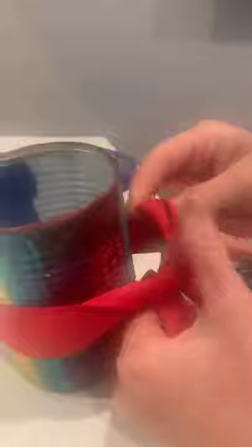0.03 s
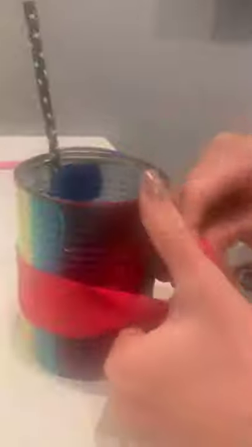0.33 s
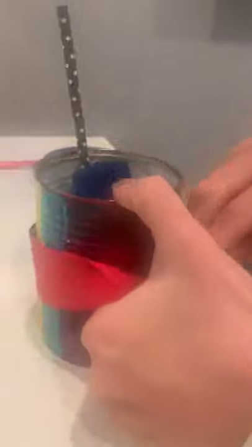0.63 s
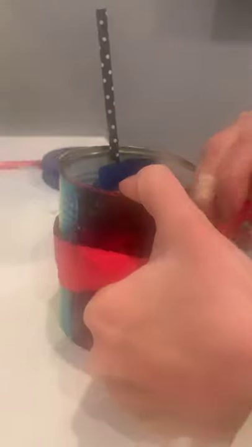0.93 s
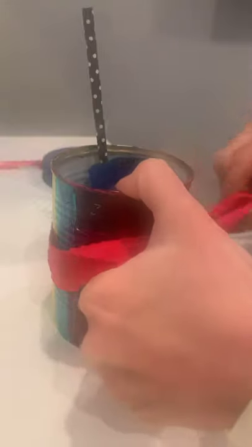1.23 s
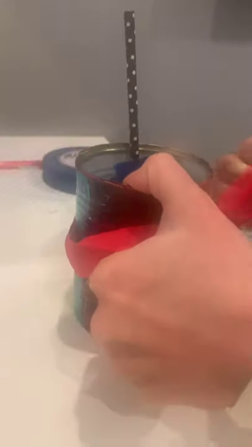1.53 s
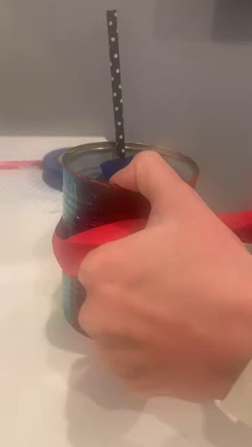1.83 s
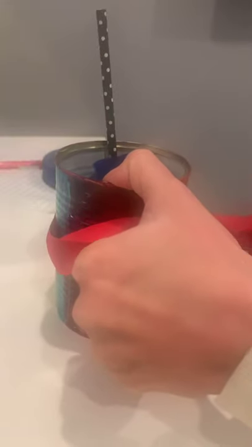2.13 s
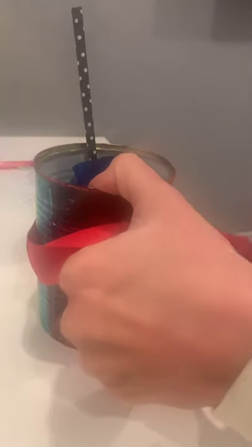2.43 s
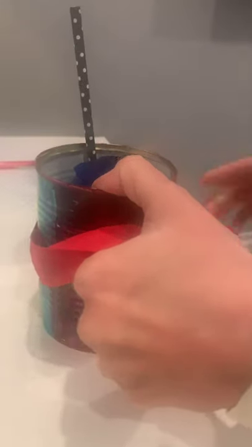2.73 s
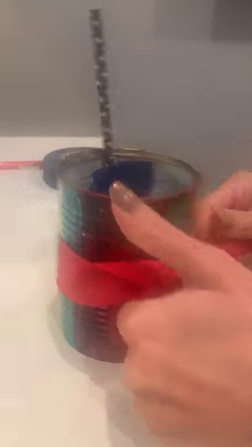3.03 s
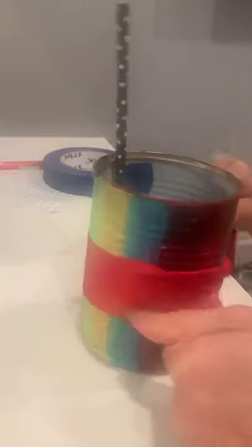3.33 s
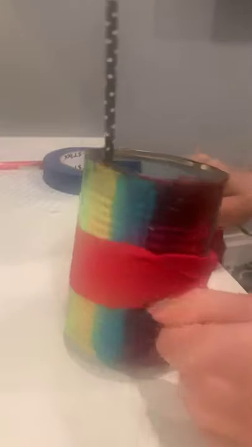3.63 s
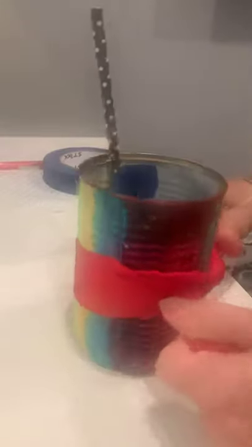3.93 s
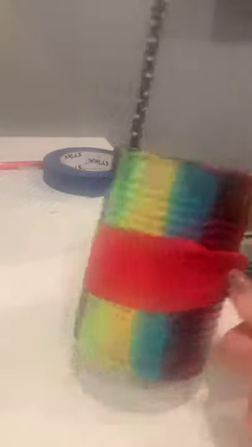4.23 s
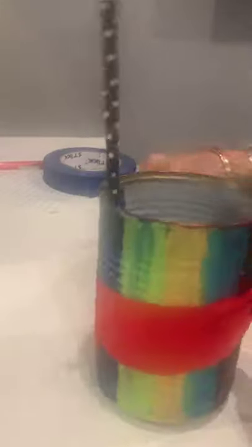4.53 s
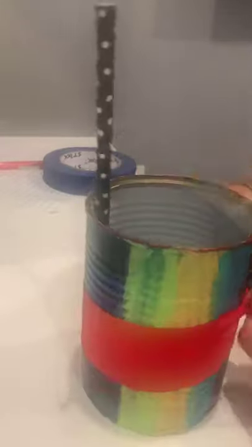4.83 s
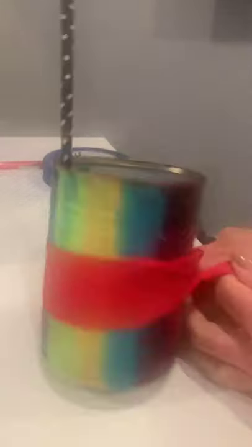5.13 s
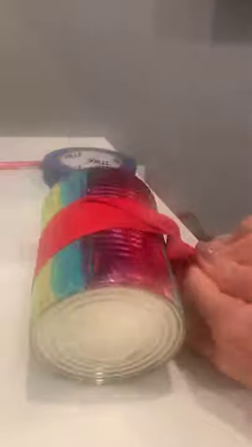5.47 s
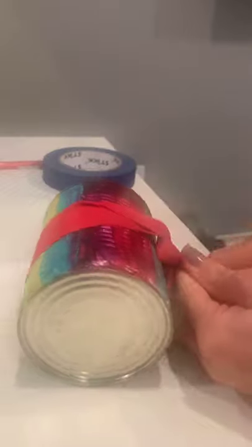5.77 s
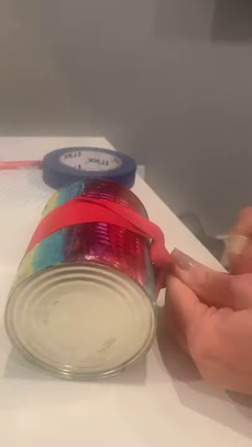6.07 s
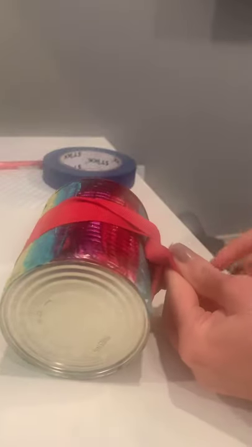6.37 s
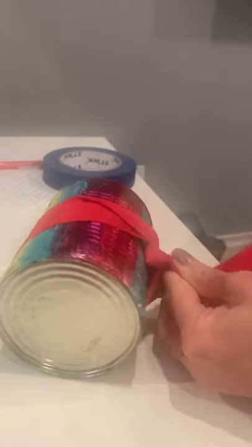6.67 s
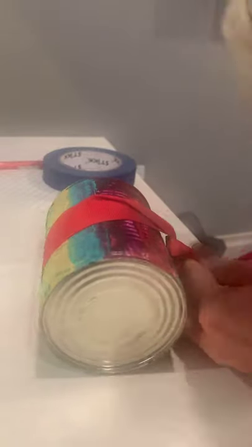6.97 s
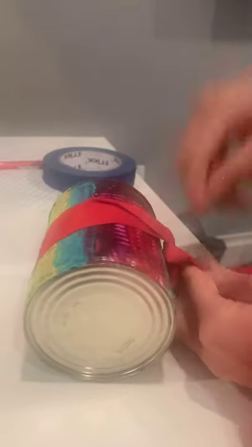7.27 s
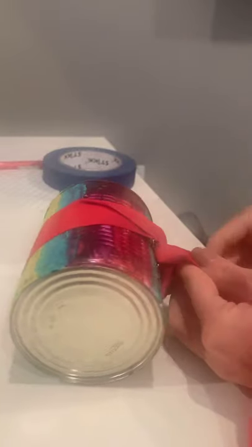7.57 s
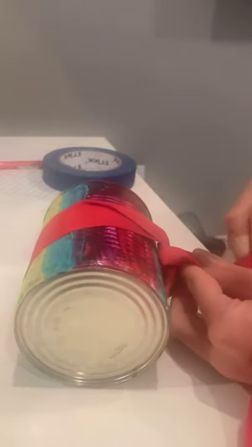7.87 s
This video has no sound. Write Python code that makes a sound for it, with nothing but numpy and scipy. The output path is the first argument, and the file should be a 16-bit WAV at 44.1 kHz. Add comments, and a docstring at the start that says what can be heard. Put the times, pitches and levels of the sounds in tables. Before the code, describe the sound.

Close to the microphone in a small room, a fabric ribbon rustles around a tin can that knocks hollowly and scuffs on a table. The ribbon is pulled through with a soft zip and a bracelet jingles. After a sharp knock and more shuffling, the can tips over, bounces and rings briefly. The bracelet jingles again, with fingernail ticks here and there and a low appliance hum throughout.

```python
"""A small room, at a table close to a phone: hands tie a fabric ribbon around a painted tin can.
The ribbon rustles as its threads catch and let go, and zips when its weave is pulled over an edge.
The can scuffs and knocks on the table, then tips, lands on its side, bounces and rings.
Fingernails tick, a bracelet jingles on the moving wrist, and an appliance hums behind it all."""
import sys
import numpy as np
from scipy import signal
from scipy.fft import rfft, irfft, next_fast_len
from scipy.io import wavfile
from scipy.ndimage import map_coordinates

SR = 44100
rng = np.random.default_rng(int(sys.argv[2]) if len(sys.argv) > 2 else 0)


def digitize_waveform(pressure):
    """Quantize a signal to 16-bit integers and store it at the path in sys.argv[1].

    Rows of a 2-D input are taken as channels; values are limited to [-1, 1].
    """
    field = np.atleast_2d(pressure).T
    bounded = np.clip(field, -1, 1)
    quanta = np.round(bounded * 32767).astype(np.int16)
    wavfile.write(sys.argv[1], SR, quanta)


N = 357210

# Levels are relative: each layer has its own trim in the mix.
# room tone: f/Hz, level/dB
HUM_PARTIALS = [(56, -54.5), (119, -53)]
RUMBLE_EQ = [(20, -40), (38, -5), (55, 4.5), (75, -4), (100, -0.5), (135, -5.5), (190, -1), (270, -14.5),
             (600, -25.5), (1500, -36), (5000, -42), (16000, -74)]
# reverb decay: f/Hz, t60/s
ROOM_DECAY = [(150, 0.46), (1000, 0.24), (5000, 0.024), (15000, 0.27)]
# phase lead of the left microphone port: f/Hz, phase/rad
LEFT_LEAD = [(0, 0), (60, -.1), (110, -1.4), (250, -3.1), (460, -6.3), (540, -7.4), (680, -6.7),
             (780, -8.7), (1000, -8.4), (1300, -6.2), (1480, -6.1), (1560, -3.8), (2050, -5.1), (2300, -4),
             (2950, -4.9), (3700, -4.6), (4800, -3.14), (6700, 0), (8900, 3.14), (13200, 9.42),
             (15300, 12.5)]
# stereo balance, left minus right: f/Hz, level/dB
LEFT_BALANCE = [(100, -1.1), (600, 0.5), (1200, -1), (1600, -5.5), (2400, -2.5), (3100, -1.5), (3700, 2),
                (5500, -1), (8000, 0)]

# the bracelet swings shut: t/s, level/dB
JINGLE_CUES = [(2.325, -37.5), (2.357, -33.5), (2.408, -31), (2.45, -33), (2.605, -50), (2.654, -45.5),
               (5.98, -62), (6.034, -49), (6.403, -40.5), (6.609, -39), (6.648, -27), (6.968, -25.5),
               (6.991, -22.5), (7.0256, -27), (7.079, -31), (7.214, -32.5), (7.237, -36), (7.317, -33)]
# the bangle's modes: f/Hz, level/dB, t60/s
BANGLE_MODES = [(7060, -12, .25), (8010, -19, .2), (9760, -14, .2), (10410, -7, .42), (11420, -13, .25),
                (11785, -9, .32), (12340, -8, .25), (12491, -1, .32), (12545, -3, .3), (14173, -3, .38),
                (14275, -5, .3), (14631, -10, .3), (14867, -8, .33), (15300, -12, .2), (15600, -9, .2)]
# fingernail ticks and fabric snaps: t/s, level/dB
TICK_CUES = [(0.0538, -41.5), (0.6466, -34), (0.8103, -35.5), (1.485, -24.5), (2.182, -20.5),
             (3.258, -39.5), (3.6122, -29.5), (4.0126, -26.5), (4.1802, -34), (4.8748, -32), (5.344, -41.5),
             (7.043, -35.5)]
# tone of ticks and rim clicks: f/Hz, level/dB
CLICK_EQ = [(500, -13.5), (2500, -7.5), (4200, -5), (6000, -3.5), (8500, -6), (12000, -6.5), (16000, -11)]

# resonances of the table and the can: f/Hz, width/Hz, level/dB
TABLE_MODES = [(136.5, 8.7, 1), (169, 29, -11.5), (211, 20, -3)]
BASE_MODES = [(256.6, 6.5, -4), (369.1, 26, 2), (429, 14, -9)]
BODY_MODES = [(557.5, 16, 5), (595.4, 13, 14.5), (611, 6.8, -7.5), (840, 42, -16.5)]
WALL_MODES = [(1068, 19, -4.5), (1129, 35, -4), (1224.4, 49, 1.5), (1471, 32, -8), (1732, 40, -4.5),
              (1930, 77, -8), (2162, 29, -10.5), (2510, 45, -10.5), (3510, 400, -16.5), (3974, 150, -10)]
# free ring of the toppled can: t/s, f/Hz, level/dB, t60/s
RING_CUES = [(5.709, 3650, -29, .04), (5.712, 2143, -44, .45), (5.712, 1075, -49, .3),
             (5.795, 1075, -44, .9)]
# the can is shoved over the table: t/s, length/s, swell/dB, base/dB, body/dB, wall/dB
SHOVE_CUES = [(.05, 0.061, 12.5, -41, -40.5, -71), (.205, 0.023, 4, -38.5, -26.5, -42),
              (.265, 0.1, -6, -38.5, -44, -50.5), (.4, 0.096, -6, -59.5, -61, -62.5),
              (.585, 0.093, 12, -53, -49.5, -51.5), (.91, 0.021, 1, -61, -48.5, -58),
              (1.24, 0.048, -9.5, -48, -50.5, -64), (1.3, 0.25, -9, -57, -54, -54.5),
              (1.55, 0.32, 6.5, -63.5, -54, -64.5), (1.745, 0.017, 9, -62, -45, -73),
              (2.15, .08, 1, -59.5, -52, -65), (2.24, 0.058, -3.5, -51, -43, -48.5),
              (2.8, 0.19, 10.5, -56, -50, -61), (2.96, 0.085, 2, -53, -40.5, -48.5),
              (3.115, 0.19, -8, -46, -43, -51), (3.335, .035, -5.5, -34.5, -44, -45.5),
              (3.42, 0.15, -1.5, -54, -52.5, -53.5), (3.525, .048, -2, -44, -37, -45.5),
              (3.6, 0.095, -4, -56, -55, -57.5), (3.73, 0.18, 5, -52, -50, -58),
              (3.97, 0.13, 2.5, -43, -43, -50.5), (4.13, 0.076, 2, -51, -47, -62),
              (4.3, 0.08, 9, -42.5, -41, -56.5), (4.4, 0.11, -1, -52.5, -49, -53.5),
              (4.55, 0.31, -3, -68, -55, -72), (4.8, 0.07, 6.5, -47.5, -37.5, -49.5),
              (4.9, 0.044, 6, -54, -41.5, -51.5), (4.94, .055, 2, -43.5, -38, -47),
              (5.122, .095, 0, -50, -38, -43.5), (5.24, 0.15, -9, -50, -44, -46.5),
              (5.72, .16, -18, -54, -46, -49.5), (6.215, 0.03, -5, -50, -72, -68)]
# the held can trembles between shoves: base/dB, body/dB, wall/dB
TREMBLE_DB = [-80, -74.5, -78.5]
# the can knocks upright, or lands on its side: t/s, body/dB, thud/dB, wall/dB, click/dB
KNOCK_CUES = [(.037, -28, -47.5, -65, -48), (.19, -35.5, -55, -48, -51), (.22, -20, -43.5, -42, -34.5),
              (.268, -34, -48, -60, -49), (.319, -11, -48, -56, -39), (.333, -11.5, -38, -30.5, -37),
              (1.249, -44, -47, -47, -48.5), (2.582, -31.5, -55.5, -57, -71),
              (2.799, -33, -60.5, -52, -56.5), (3.012, -24, -59.5, -47, -66),
              (3.12, -30.5, -63.5, -41, -51.5), (3.326, -8, -36, -18, -22.5), (3.735, -37, -55, -72, -52),
              (3.946, -31.5, -61.5, -59, -54), (3.966, -20, -44.5, -36, -43.5),
              (4.31, -30.5, -51, -52, -47), (4.344, -28.5, -45, -52, -52), (4.673, -64, -43.5, -46.5, -55),
              (4.873, -37, -47, -39.5, -53), (5.071, -59, -57, -54, -57), (5.131, -31, -53.5, -63, -64),
              (5.344, -46, -46, -46, -68), (5.604, -60, -51.5, -54, -45.5), (6.218, -72, -52, -59, -40),
              (7.402, -75, -59.5, -66, -58)]
FALL_CUE = (5.709, -26, -33, -30.5, -31.5)
# lost at each bounce: body/dB, thud/dB, wall/dB, click/dB
BOUNCE_LOSS = [2.7, 3.2, 6.5, 19]

# threads passing over an edge, one list a pull: t/s, f/Hz, level/dB
ZIP_PULLS = [
    [(1.75, 600, -50), (1.84, 1050, -42.5), (1.89, 1250, -36.5), (1.96, 1370, -44), (2.02, 1540, -44.5),
     (2.05, 1275, -45.5), (2.11, 1450, -39), (2.16, 1570, -46), (2.21, 1200, -51)],
    [(6.64, 2010, -81), (6.675, 1900, -51), (6.705, 1490, -59), (6.73, 1610, -60), (6.758, 1950, -45),
     (6.79, 1666, -54), (6.815, 1580, -47.5), (6.85, 1795, -67.5)],
]
# the ribbon as a sounding board, its hiss and its rasp: f/Hz, level/dB
ZIP_EQ = [(400, 9), (700, -8), (1300, -4.5), (2600, 0.5), (3400, -14), (5000, -16)]
HISS_EQ = [(1500, -35.5), (2800, -4), (4200, 0.5), (5500, 0.5), (7500, -5), (9000, -2.5), (12000, -4),
           (15500, -6.5)]
RASP_EQ = [(300, -13.5), (650, -2), (850, -7.5), (1250, -3.5), (1700, -2), (2350, 4.5), (3000, -14.5),
           (5000, -12.5)]
# the ribbon rubs over fingers and can: t/s, length/s, swell/dB, hiss/dB, rasp/dB
RUB_CUES = [(0, 0.19, -13, -56, -60.5), (.18, 0.026, -1.5, -45, -43.5), (.25, 0.15, -1.5, -60, -59),
            (.45, 0.23, 8.5, -54.5, -54), (.72, 0.066, -4, -60.5, -61.5), (.805, 0.023, -1, -52.5, -53.5),
            (.87, 0.12, 6.5, -57, -56), (1, 0.22, 0.5, -51.5, -52), (1.25, 0.23, -3.5, -54.5, -52.5),
            (1.475, .11, 7, -46, -43.5), (1.585, 0.23, 3.5, -47, -44), (1.805, 0.37, 2.5, -41.5, -40),
            (2.21, .08, -5, -55, -56), (2.335, 0.11, -5.5, -57, -79.5), (2.735, 0.26, 4, -55, -58.5),
            (2.955, 0.33, 6.5, -48.5, -53), (3.33, 0.058, -4, -51.5, -55), (3.42, 0.28, 2.5, -64, -65.5),
            (3.595, 0.069, -7.5, -51, -59.5), (3.68, 0.092, -5.5, -65, -65.5), (3.84, 0.2, -3, -59, -64.5),
            (4, 0.057, 2, -50.5, -51), (4.1, 0.33, 6, -57, -61), (4.55, 0.1, 9, -66, -76),
            (4.66, 0.21, 11.5, -55.5, -59.5), (4.935, 0.064, -11, -51, -55.5), (5.01, .31, 2.5, -57.5, -58),
            (5.34, 0.28, 2, -62, -60.5), (5.585, .23, 2.5, -50.5, -57), (5.86, .05, -1, -64, -65.5),
            (6.18, 0.15, 1, -55, -55.5), (6.37, .23, 3.5, -64.5, -66.5), (6.61, 0.22, -1, -51.5, -56.5),
            (6.89, 0.16, 10, -62, -62.5), (7.07, 0.16, -2, -61.5, -67.5), (7.39, .19, 6, -63.5, -66.5),
            (7.64, .1, 7.5, -60.5, -62.5), (7.785, .09, 8.5, -59, -64.5), (7.91, .19, 2.5, -56, -62)]
# treble shelf on the hiss: t/s, level/dB
TREBLE_RIDE = [(0, 4.5), (.7, -2), (1.4, 0.5), (2.3, -3), (3.6, 2), (4.8, -0.5), (5.2, -3.5), (5.45, -11.5),
               (5.8, -4.5), (6.7, 1), (8.1, -9)]


def amp(db):
    """Decibels to gain."""
    return 10 ** (np.asarray(db) / 20)


def unit(x):
    """Scale to rms 1."""
    return x / np.sqrt(np.mean(x ** 2) + 1e-20)


def along(points, hz):
    """Read a curve on a log frequency axis."""
    f, values = np.transpose(points)
    return np.interp(np.log(hz + 1), np.log(f + 1), values)


def automation(rows):
    """One value per sample for each column after the time."""
    times, *columns = np.transpose(rows)
    return [np.interp(np.arange(N) / SR, times, column) for column in columns]


def wobble(rate):
    """A smooth random curve, rate knots a second."""
    return map_coordinates(rng.standard_normal(int(N * rate / SR) + 4), [np.arange(N) * rate / SR])


def filtered(x, response):
    """Filter x by a complex frequency response."""
    n = x.shape[-1]
    m = next_fast_len(n + SR // 4)
    return irfft(rfft(x, m) * response(np.fft.rfftfreq(m, 1 / SR)), m)[..., :n]


def coloured(x, eq):
    """x through an EQ curve, at rms 1."""
    return unit(filtered(x, lambda hz: amp(along(eq, hz))))


def resonate(x, modes):
    """x through a bank of resonances, at rms 1."""
    return unit(filtered(x, lambda f: sum(
        amp(db) * 1j * f * width / (hz * hz - f * f + 1j * f * width) for hz, width, db in modes)))


def add(track, s, sound):
    """Mix a sound into the track at time s."""
    part = track[max(round(s * SR), 0):][:len(sound)]
    part += sound[:len(part)]


def slips(rate, spread_db):
    """Tiny stick-slip impulses of unequal size and either sign, at rms 1."""
    sizes = amp(spread_db * np.minimum(rng.exponential(size=N), 3))
    return unit((rng.random(N) < rate / SR) * sizes * np.sign(rng.standard_normal(N)))


def stroke(length_s, swell_db, attack_s, release_db_per_s):
    """Envelope of one hand movement: it rises, holds while swelling or easing, and dies away."""
    t = np.arange(int((length_s + .5) * SR)) / SR
    hold_db = swell_db * (np.minimum(t / length_s, 1) - .5)
    return np.minimum(t / attack_s, 1) * amp(hold_db - release_db_per_s * np.maximum(t - length_s, 0))


def strokes(cues, rest_db, attack_s, release_db_per_s):
    """One envelope per level column: hand movements add in power over a resting floor."""
    power = np.ones((len(rest_db), N)) * amp(rest_db)[:, None] ** 2
    for s, length_s, swell_db, *levels_db in cues:
        shape = stroke(length_s, swell_db, attack_s, release_db_per_s)
        for track, db in zip(power, levels_db):
            add(track, s, (amp(db) * shape) ** 2)
    return np.sqrt(power)


def room_tone():
    """The bed: an appliance hums unsteadily over the room's rumble."""
    t = np.arange(N) / SR
    hum = sum(amp(db + 1.8 * wobble(6)) * np.sin(2 * np.pi * hz * t + .5 * wobble(2.7))
              for hz, db in HUM_PARTIALS)
    return hum + amp(-55) * coloured(rng.standard_normal(N), RUMBLE_EQ)


def room_reverb(x):
    """The walls answer each microphone port with a short tail."""
    hz, t, noise = signal.stft(rng.standard_normal((3, SR // 2)), SR, nperseg=256)
    decay = amp(-60 * t / along(ROOM_DECAY, hz)[:, None])
    _, tails = signal.istft(noise * decay, SR, nperseg=256)
    stereo = tails[0] + .71 * tails[1:]  # close ports share part of the tail
    predelayed = np.pad(x, (300, 0))[None]
    return signal.fftconvolve(predelayed, stereo / np.linalg.norm(stereo[0]), axes=1)[:, :N]


def bracelet():
    """Every collision rings the bangle and shakes small links, which clash at pitches of their own."""
    out, t = np.zeros(N), np.arange(SR // 3) / SR
    hz, mode_db, t60 = np.transpose(BANGLE_MODES)[..., None]
    attack = 1 - np.exp(-t / .003)
    rebounds = [(s + .015, db - 7.5) for s, db in JINGLE_CUES]  # the links meet a second time
    for s, db in JINGLE_CUES + rebounds:
        strength, detune, phase = rng.standard_normal((3, len(BANGLE_MODES), 1))
        partials = np.sin(2 * np.pi * (hz * (1 + .0025 * detune) * t + phase))
        ring = amp(mode_db + 3.2 * strength - 60 * t / t60) * partials
        add(out, s, amp(db - 17) * attack * ring.sum(0))
        for lag, pitch, softness in rng.random(size=(36, 3)):
            link_hz = 15900 - 6500 * pitch ** 1.3
            clash = np.sin(2 * np.pi * link_hz * t) * attack * amp(-60 * t / .065)
            add(out, s - .003 + .02 * lag ** 2, amp(db - 9.5 - 29 * softness) * clash)
    return out


def nail_ticks():
    """Nails and snapping fabric give short dry clicks."""
    out, t = np.zeros(N), np.arange(SR // 10) / SR
    for s, db in TICK_CUES:
        click = coloured(rng.standard_normal(len(t)) * amp(-60 * t / .035), CLICK_EQ)
        add(out, s, amp(db - 1) * click / np.abs(click).max())
    return out


def can_tipping(start_s=5.24):
    """The table rumbles as the can rolls over its rim."""
    envelope = np.zeros(N)
    lean = stroke(length_s=.29, swell_db=10, attack_s=.13, release_db_per_s=450)
    add(envelope, start_s, amp(-44.5) * lean)
    roll_eq = [(30, -27.5), (55, 7), (85, 14), (140, 0), (280, -31), (800, -59)]
    return envelope * coloured(rng.standard_normal(N), roll_eq)


def can_ring():
    """With the can on its side, its open mouth rings freely."""
    out, t = np.zeros(N), np.arange(SR) / SR
    attack = 1 - np.exp(-t / .0011)
    for s, hz, db, t60 in RING_CUES:
        add(out, s, amp(db - 60 * t / t60) * attack * np.sin(2 * np.pi * hz * t))
    return out


def can_scuffs():
    """The rim judders over the table and shakes base and body; grit catches and rings the wall."""
    base, body, wall = strokes(SHOVE_CUES, TREMBLE_DB, attack_s=.0099, release_db_per_s=379.5)
    catch = amp(3.13 * wobble(45))
    judder = slips(rate=450, spread_db=-.5) * catch
    grit = (slips(rate=900, spread_db=1.5) + .32 * slips(rate=30, spread_db=4)) * catch
    shell = body * resonate(judder, BODY_MODES) + wall * resonate(grit, WALL_MODES)
    return base * resonate(judder, BASE_MODES) + amp(-3) * shell


def can_bounces(count=2, first_flight_s=.035, shrink=.81):
    """Knock cues for the fall: the can lands and bounces, each time sooner and softer."""
    s, *levels_db = FALL_CUE
    lags = np.cumsum([0, *(first_flight_s * shrink ** np.arange(count))])
    return [(s + lag, *(np.array(levels_db) - k * np.array(BOUNCE_LOSS))) for k, lag in enumerate(lags)]


def struck(blow, modes, soft_hz):
    """Paint and paper cushion a blow and round off its treble; hand and table damp the ring."""
    t = np.arange(len(blow)) / SR
    cushioned = filtered(blow, lambda hz: 1 / (1 + 1j * hz / soft_hz) ** 2)
    return unit(amp(-60 * t / .17) * resonate(cushioned, modes))


def can_knocks():
    """Each blow clicks at the rim, rings the can's base, body and wall, and thuds the table."""
    board, can, t = np.zeros(N), np.zeros(N), np.arange(SR // 5) / SR
    click_envelope = (amp(-60 * t / .017) + .1 * amp(-60 * t / .09)) * (1 - np.exp(-t / .0012))
    for s, body_db, thud_db, wall_db, click_db in KNOCK_CUES + can_bounces():
        rim_chatter = .033 * rng.standard_normal(len(t)) * amp(-60 * t / .095)
        blow = (t == 0) + rim_chatter
        add(board, s, amp(thud_db - 5) * struck(blow, TABLE_MODES, soft_hz=896))
        add(can, s - .001, amp(thud_db - 11.5) * struck(blow, BASE_MODES, soft_hz=1200))
        add(can, s - .001, amp(body_db - 23) * struck(blow, BODY_MODES, soft_hz=1740))
        add(can, s, amp(wall_db - 15.5) * struck(blow, WALL_MODES, soft_hz=5000))
        # a brief swell of noise leads into each knock and softens its onset
        lead_in = rng.standard_normal(SR // 125) * np.linspace(0, 1, SR // 125)
        add(can, s - .0095, amp(click_db - 16) * coloured(lead_in, CLICK_EQ))
        click = rng.standard_normal(len(t)) * click_envelope
        add(can, s - .0015, amp(click_db - 18.5) * coloured(click, CLICK_EQ))
    # in the board, bending waves carry the treble faster than the bass
    return can + filtered(board, lambda hz: np.exp(-1j * .879 * np.sqrt(hz)))


def ribbon_zips():
    """The weave ticks over an edge: a rough pitch that follows the speed of the pull."""
    out, t = np.zeros(N), np.arange(N) / SR
    for pull in ZIP_PULLS:
        hz, db = automation(pull)
        phase = 2 * np.pi * np.cumsum(hz * (1 + .045 * wobble(600))) / SR
        tone = np.sin(phase) + amp(-3) * np.sin(2 * phase) + amp(-7) * np.sin(3 * phase)
        gate = (t > pull[0][0]) * (t < pull[-1][0])
        out += gate * amp(db + 1 + 2.5 * wobble(150)) * tone
    return filtered(out, lambda hz: amp(along(ZIP_EQ, hz)))


def thread_friction():
    """Threads catch and let go: smooth noise with fine grains."""
    return rng.standard_normal(N) + .78 * slips(rate=640, spread_db=2)


def ribbon_rustle(wall_share=.12, shelf_hz=8000):
    """Rubbed fabric hisses, its creases pop, and part of its rasp sounds through the can's wall."""
    hiss_gain, rasp_gain = strokes(RUB_CUES, rest_db=[-72.5, -76], attack_s=.024, release_db_per_s=301)
    grip = amp(1.3 * wobble(55))
    hiss = coloured(thread_friction() + amp(-15.5) * slips(rate=75, spread_db=8.5), HISS_EQ)
    treble_db, = automation(TREBLE_RIDE)
    treble = filtered(hiss, lambda hz: 1 / (1 + (shelf_hz / (hz + 1)) ** 6))
    hiss += (amp(treble_db) - 1) * treble
    cloth = coloured(thread_friction(), RASP_EQ)
    tin = resonate(slips(rate=900, spread_db=4), WALL_MODES)
    rasp = np.sqrt(1 - wall_share) * cloth + np.sqrt(wall_share) * tin
    return grip * (amp(.6) * hiss_gain * hiss + amp(-3.5) * rasp_gain * rasp)


def scene():
    """Close handling sounds with a touch of reverb, over the room tone."""
    ribbon = ribbon_rustle() + ribbon_zips()
    can = can_scuffs() + can_knocks() + can_ring() + can_tipping()
    close = ribbon + can + nail_ticks() + bracelet()
    return close + amp(-15) * room_reverb(close) + room_tone()


def record(dry, top_hz=15900):
    """The phone's two ports differ in phase and level, and pass nothing above its band limit."""
    side = np.array([[.5], [-.5]])  # left, right

    def ports(hz):
        lead = np.interp(hz, *np.transpose(LEFT_LEAD))
        return np.exp(1j * side * lead) * amp(side * along(LEFT_BALANCE, hz)) * (hz < top_hz)
    return filtered(dry, ports)


dry = scene()
out = record(dry)
digitize_waveform(out)
```